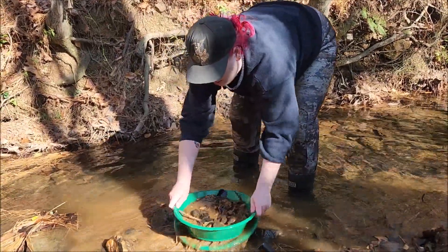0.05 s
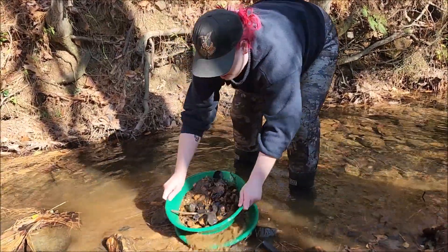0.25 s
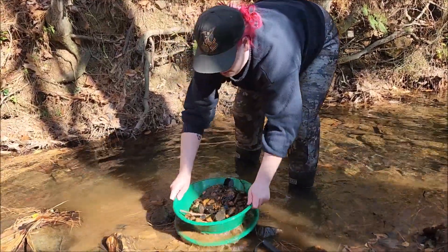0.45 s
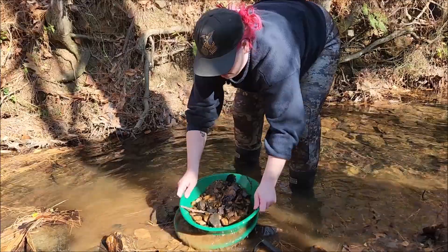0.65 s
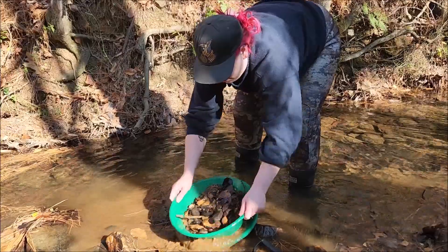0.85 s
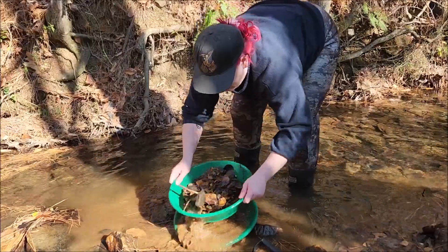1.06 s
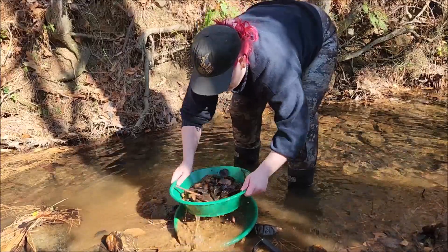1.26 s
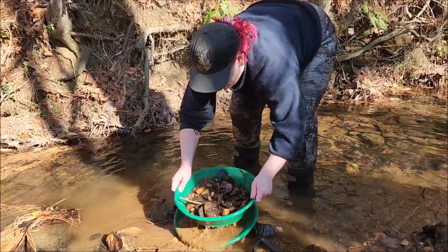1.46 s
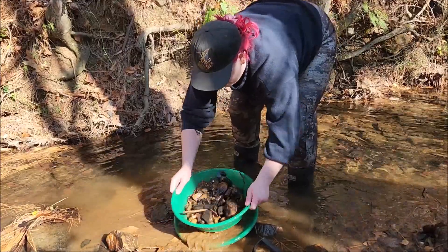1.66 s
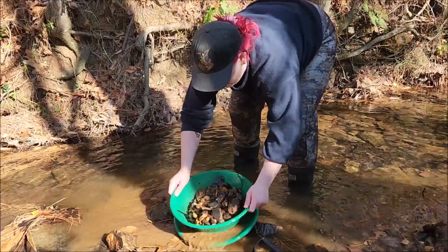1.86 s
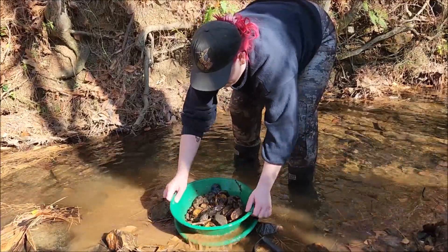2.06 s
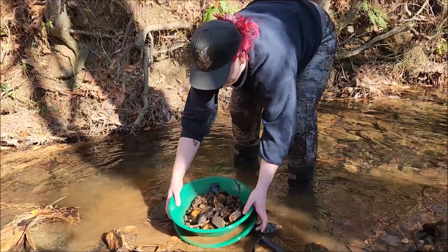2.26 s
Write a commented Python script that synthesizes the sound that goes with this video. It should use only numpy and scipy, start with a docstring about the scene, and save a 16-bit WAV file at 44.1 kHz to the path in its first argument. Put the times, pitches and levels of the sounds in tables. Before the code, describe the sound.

Wet gravel rattles and water sloshes in a plastic sieve shaken in a creek.

```python
"""Sieving gravel in a creek

A plastic sieve of wet gravel is shaken back and forth in shallow water. With each stroke pebbles
tumble and knock, ringing the plastic; grit scrapes over the mesh, stones click, and water sloshes
through in splashes and ringing bubbles. The creek trickles behind; a breeze rumbles on the microphone."""
import sys
import numpy as np
from scipy import signal
from scipy.fft import rfft, irfft, next_fast_len
from scipy.io import wavfile
from scipy.ndimage import uniform_filter1d

SR = 44100
rng = np.random.default_rng(int(sys.argv[2]) if len(sys.argv) > 2 else 0)


def materialize(psi):
    """Save the field psi as 16-bit PCM at rate SR to the path in sys.argv[1].

    A 1-D psi becomes a single channel; in a 2-D psi each row is a channel.
    """
    bounded = np.clip(np.atleast_2d(psi).T, -1, 1)
    quanta = np.round(bounded * 32767).astype(np.int16)
    wavfile.write(sys.argv[1], SR, quanta)


N = 101429
GRAIN_SAMPLES, PREROLL_SAMPLES = 4096, 32
GRAIN_T = np.arange(GRAIN_SAMPLES) / SR  # seconds into one contact or bubble


def amp(db):
    """Decibels to gain."""
    return 10 ** (np.asarray(db) / 20)


def curve_at(points, hz):
    """Reads a curve on a log-frequency axis."""
    freqs, values = np.transpose(points)
    return np.interp(np.log(hz + 1), np.log(freqs + 1), values)


def fader(curve, column=1):
    """Gain at every sample from one dB column of a level curve."""
    rows = np.array(curve)
    return amp(np.interp(np.arange(N) / SR, rows[:, 0], rows[:, column]))


def add(mix, start_s, sound):
    """Drops a stereo sound into the mix."""
    part = mix[:, max(round(start_s * SR), 0):][:, :sound.shape[1]]
    part += sound[:, :part.shape[1]]


# How alike the two channels are: freq_hz, coherence
STEREO_LIKENESS = [(50, 0.94), (200, 1), (550, 0.97), (1200, 0.92), (1550, 0.96), (2400, 0.34),
                   (3100, 0.15), (4200, 0.56), (6000, 0.12), (15000, 0.067)]
# Pan across the spectrum: freq_hz, left_minus_right_db
STEREO_PAN = [(100, 0.5), (400, -0.5), (560, -3), (900, 0.2), (1600, 0.5), (2200, 3), (3000, 12),
              (4000, 4.5), (5000, 1), (7000, -3), (9000, 7), (10800, 4), (12200, -3.5), (16000, 1)]
# Phase between the channels: freq_hz, left_lead_rad
STEREO_PHASE = [(500, 0.32), (1500, 0.85), (2800, 1), (3400, -1.4), (4300, 0.06), (16000, -3)]
def stereo(a, b):
    """Spreads two versions of a sound as mid and side: narrow in the bass, wide in the treble."""
    hz = np.fft.rfftfreq(len(a), 1 / SR)
    likeness = np.clip(curve_at(STEREO_LIKENESS, hz), 0, 1)
    mid = rfft(a) * np.sqrt((1 + likeness) / 2)
    side = rfft(b) * np.sqrt((1 - likeness) / 2)
    lean = amp(curve_at(STEREO_PAN, hz) / 2) * np.exp(.5j * curve_at(STEREO_PHASE, hz))
    return irfft([(mid + side) * lean, (mid - side) / lean])


def stereo_grain(pair):
    """Brings two versions of a hit to equal energy and spreads them in stereo."""
    return stereo(*[np.roll(hit, PREROLL_SAMPLES) / np.linalg.norm(hit) for hit in pair])


def shower(voice, per_s, spread_db, even_s, variants=24):
    """A cloud of randomly timed grains of mixed sizes, its level evened out over even_s."""
    hits = amp(spread_db * np.minimum(rng.exponential(1, N), 4))
    hits *= rng.random(N) < per_s / SR
    hits /= np.sqrt(abs(uniform_filter1d(hits ** 2, int(even_s * SR) + 1)) + 1e-6)
    variant = rng.integers(0, variants, N)
    cloud = sum(signal.oaconvolve((hits * (variant == k))[None], voice(), axes=1)[:, :N]
                for k in range(variants))
    return cloud / np.std(cloud.mean(0))


# Resonances of the loaded plastic sieve: pitch_hz, level_db, t60_s
SIEVE_MODES = [(388, -26, 0.048), (550.5, -21.5, 0.074), (905, -19, 0.055), (1081, -8.5, 0.025),
               (1430.6, -2, 0.039), (1542, -1, 0.028), (1650, 1.5, 0.018), (1960, -15.5, 0.04),
               (2185, -11, 0.044), (2370, -5.5, 0.01), (3750, -9.5, 0.012), (4240, -7, 0.0072),
               (4820, -15, 0.023)]
def sieve_ring(detune, uneven_db, rise_s, square_on=False):
    """Each strike spot weights and shifts the modes; a square blow starts the mid's modes in step."""
    hz, db, t60_s = np.transpose(SIEVE_MODES)[:, :, None]
    shift, weight, polarity = rng.standard_normal((3, 2, len(SIEVE_MODES), 1))
    if square_on:
        polarity[0] = 1
    decay = amp(db + uneven_db * weight - 60 * GRAIN_T / t60_s)
    modes = np.sign(polarity) * decay * np.sin(2 * np.pi * hz * (1 + detune * shift) * GRAIN_T)
    attack = 1 - np.exp(-GRAIN_T / rise_s)
    return stereo_grain(modes.sum(1) * attack)


# The shaking strokes, as fader moves: time_s, pebbles_db, grit_db
STROKES = [(0, -38, -54.5), (.11, -40.5, -49.5), (.18, -40, -59.5), (.22, -26.5, -41.5), (.3, -30, -51),
           (.375, -20.5, -39.5), (.43, -44, -52.5), (.455, -35.5, -55), (.49, -19, -36), (.53, -24, -38.5),
           (.588, -39, -55), (.615, -18.5, -38.5), (.65, -17, -28.5), (.71, -27.5, -41), (.755, -17, -35),
           (.84, -28.5, -48), (.9, -20, -34), (.925, -19.5, -23), (.96, -18, -33.5), (1.03, -27.5, -39.5),
           (1.065, -38, -54.5), (1.092, -42, -46), (1.107, -26, -42.5), (1.14, -18.5, -29),
           (1.25, -20.5, -29.5), (1.285, -14, -26), (1.315, -25, -33.5), (1.338, -53, -47),
           (1.37, -33.5, -47.5), (1.42, -14.5, -27.5), (1.51, -30.5, -28), (1.6, -26, -40.5),
           (1.67, -23, -32), (1.86, -24, -40.5), (1.93, -22.5, -34), (1.97, -14, -28.5),
           (2.03, -26.5, -44.5), (2.06, -31.5, -48.5), (2.12, -45.5, -59), (2.23, -68, -58.5),
           (2.3, -48, -50.5)]
def pebbles(gain_db=-3):
    """A dense tumble of pebbles keeps the sieve ringing."""
    rattle = shower(lambda: sieve_ring(detune=.012, uneven_db=3.5, rise_s=.00013),
                    per_s=850, spread_db=2.8, even_s=.025)
    return amp(gain_db) * fader(STROKES) * rattle


def burst(spectrum, t60_s):
    """One small contact or splash: a fast-dying puff of noise, coloured by a spectrum."""
    hz = abs(np.fft.fftfreq(GRAIN_SAMPLES, 1 / SR))
    log_gain = np.log(amp(curve_at(spectrum, hz)))
    colour = np.exp(np.conj(signal.hilbert(log_gain)))  # minimum phase keeps the attack sharp
    noise = rng.standard_normal((2, GRAIN_SAMPLES)) * amp(-60 * GRAIN_T / t60_s)
    return stereo_grain(np.fft.ifft(np.fft.fft(noise) * colour).real)


def clink(low_hz=3300, high_hz=5200, t60_s=.084):
    """A thin stone chip rings briefly at its own pitch."""
    hz = low_hz * (high_hz / low_hz) ** rng.random()
    decay = amp(-60 * GRAIN_T / t60_s)
    tones = [decay * np.sin(2 * np.pi * (hz * GRAIN_T + phase)) for phase in rng.random(2)]
    return stereo(*np.roll(tones, PREROLL_SAMPLES, axis=1))


# Tone colour of a gritty contact: freq_hz, level_db
GRIT_SPECTRUM = [(300, -13.5), (900, 0.5), (1600, 12.5), (2300, 1.5), (3100, -7), (4000, 3), (4900, -2),
                 (5700, -6), (6700, -8.5), (7600, -5.5), (9000, -9.5), (10800, -5.5), (12000, -5.5),
                 (13500, -13), (16000, -9)]
def grit(scrape_db=8, clink_db=-6):
    """Wet sand and small stones wash over each other and the mesh, with chips clinking among them."""
    scrape = shower(lambda: burst(GRIT_SPECTRUM, t60_s=.018), per_s=3800, spread_db=2.9, even_s=.025)
    clinks = shower(clink, per_s=220, spread_db=4, even_s=.06, variants=16)
    return fader(STROKES, column=2) * (amp(scrape_db) * scrape + amp(clink_db) * clinks)


def bubble(low_hz=450, high_hz=2400, cycles=22, rise=.19):
    """A small bubble rings and rises in pitch, fading 40 dB over about the given cycles."""
    hz = low_hz * (high_hz / low_hz) ** rng.random()
    age = GRAIN_T * hz / cycles
    envelope = amp(-40 * age) * np.minimum(GRAIN_T * hz, 1)
    tone = np.sin(2 * np.pi * hz * GRAIN_T * (1 + rise * age / 2))
    return np.tile(envelope * tone, (2, 1))


# Surges of water through the mesh: time_s, level_db
SURGES = [(0.0, -43), (0.22, -44.5), (0.29, -36), (0.31, -42), (0.36, -33.5), (0.45, -52), (0.48, -27.5),
          (0.54, -35.5), (0.58, -59), (0.63, -26.5), (0.72, -41), (0.76, -27), (0.84, -52), (0.94, -21.5),
          (1.07, -53), (1.23, -26.5), (1.3, -25), (1.36, -69), (1.41, -53), (1.54, -24.5), (1.57, -66),
          (1.71, -32.5), (1.88, -45.5), (1.97, -27), (2.15, -50.5), (2.3, -48)]
# Tone colour of a splash: freq_hz, level_db
SPLASH_SPECTRUM = [(40, -36), (150, -24), (290, -12), (390, -3), (540, 2), (680, -8.5), (1100, -2.5),
                   (2500, -7.5), (16000, -40)]
def slosh(splash_db=.5, bubble_db=-5):
    """Water pushes through the mesh and breaks into splashes and bubbles."""
    splashes = shower(lambda: burst(SPLASH_SPECTRUM, t60_s=.04), per_s=460, spread_db=4, even_s=.16)
    bubbles = shower(bubble, per_s=130, spread_db=6, even_s=.033)
    return fader(SURGES) * (amp(splash_db) * splashes + amp(bubble_db) * bubbles)


# Swells under the sieve, late in the strokes: time_s, level_db
CHURN_SWELLS = [(0, -61), (.74, -55), (.765, -36.5), (.81, -58), (.91, -56), (.96, -40.5), (1.005, -40.5),
                (1.06, -58), (1.11, -63), (1.15, -44.5), (1.2, -54), (1.28, -38.5), (1.35, -60),
                (1.52, -37.5), (1.61, -56.5), (1.76, -45), (1.89, -53.5), (1.97, -45), (2.14, -59),
                (2.3, -54.5)]
# Low body of the churning: freq_hz, level_db
CHURN_SPECTRUM = [(30, -9), (70, -13.5), (120, -2), (190, 0), (280, -1), (420, -2), (900, -49), (3000, -93)]
def churn(gain_db=4.5):
    """Water churns deeply as the sieve plunges."""
    body = shower(lambda: burst(CHURN_SPECTRUM, t60_s=.016),
                  per_s=540, spread_db=2.5, even_s=.075, variants=12)
    return amp(gain_db) * fader(CHURN_SWELLS) * body


# Tone colour of the trickle: freq_hz, level_db
CREEK_SPECTRUM = [(60, 0), (250, -17), (550, 7), (1000, 15), (1600, 5), (3000, -18), (4500, -15),
                  (6500, -19), (11000, -30), (16000, -5)]
def creek(gain_db=-58.5):
    """Countless tiny splashes blend into a faint, steady trickle."""
    return amp(gain_db) * shower(lambda: burst(CREEK_SPECTRUM, t60_s=.021),
                                 per_s=1300, spread_db=2.8, even_s=.5, variants=12)


# Tone colour of the wind rumble: freq_hz, level_db
BREEZE_SPECTRUM = [(10, -3), (30, -1.5), (62, 4.5), (90, -1), (150, -28), (400, -41), (2000, -80)]
# Gusts: time_s, level_db
BREEZE_GUSTS = [(0, -37), (.03, -41), (.07, -49), (.17, -38.5), (.25, -48), (.31, -36), (.34, -44.5),
                (.45, -41.5), (.52, -54), (2.3, -47.5)]
def breeze():
    """Light gusts buffet the microphone with a low rumble."""
    length = 2 * next_fast_len(N)
    colour = amp(curve_at(BREEZE_SPECTRUM, np.fft.rfftfreq(length, 1 / SR)))
    air = irfft(rfft(rng.standard_normal((2, length))) * colour)
    rumble = stereo(*air)[:, :N]
    return fader(BREEZE_GUSTS) * rumble / np.sqrt(np.mean(rumble ** 2))


# Stone-on-stone accents: start_s, level_db
STONE_CLICKS = [(0.015, -27), (0.021, -24), (0.917, -18), (1.165, -13), (1.326, -17), (1.345, -22),
                (1.417, -15), (1.714, -5), (2.054, -24), (2.125, -26), (2.242, -31), (2.255, -21)]
def stone_clicks(gain_db=10):
    """Hard stones snap against each other."""
    out = np.zeros((2, N))
    for start_s, db in STONE_CLICKS:
        snap = np.diff(burst(GRIT_SPECTRUM, t60_s=.014), axis=1)  # tilted bright
        add(out, start_s - .0005, amp(db + gain_db) * snap)
    return out


# Single chips of stone: start_s, pitch_hz, level_db
CHIP_TICKS = [(.029, 4800, -17), (.088, 4000, -15), (.109, 4200, -11), (1.178, 4100, 11), (1.744, 4570, 1),
              (2.115, 4000, -20)]
def chip_ticks():
    """Small chips tick, each a narrow burst around its own pitch."""
    out = np.zeros((2, N))
    for start_s, hz, db in CHIP_TICKS:
        peak = [(hz / 2, -30), (hz, 0), (hz * 2, -30)]
        add(out, start_s - .0005, amp(db) * burst(peak, t60_s=.011))
    return out


# Single stones striking the sieve: start_s, level_db
WALL_KNOCKS = [(.089, -26), (.201, -23), (.242, -18), (.477, -14), (.486, -10), (.611, -17), (.645, -10),
               (.731, -9), (.744, -10), (.762, -12), (.824, -16), (.914, -5), (.930, -9), (.949, -4),
               (.959, -6), (1.102, -21), (1.219, -11), (1.278, -3), (1.285, -6), (1.296, -4), (1.324, -17),
               (1.3445, -13.5), (1.39, -18), (1.422, -11), (1.462, -9), (1.496, -9), (1.53, -11),
               (1.613, -16), (1.67, -11), (1.785, -15), (1.897, -8.5), (1.913, -12), (1.971, -8),
               (2.038, -19), (2.051, -16), (2.09, -25), (2.143, -32), (2.159, -21), (2.255, -28),
               (2.287, -28)]
def knocks(gain_db=16.5, tick_db=-12.5, contact_hz=2400, max_bounce_s=.004, bounce_db=-5):
    """Larger stones hit the soft plastic wall with a dull, hollow ring and a tick, and bounce once."""
    out = np.zeros((2, N))
    soft_contact = signal.butter(2, contact_hz, fs=SR)
    for start_s, db in WALL_KNOCKS:
        bounce_s = max_bounce_s * rng.uniform(.67, 1)
        for delay_s, drop_db in ((0, 0), (bounce_s, bounce_db)):
            ring = sieve_ring(detune=.014, uneven_db=1.5, rise_s=.00043, square_on=True)
            hollow = signal.lfilter(*soft_contact, ring)
            tick = amp(tick_db) * burst(GRIT_SPECTRUM, t60_s=.008)
            add(out, start_s + delay_s - .001, amp(db + drop_db + gain_db) * (hollow + tick))
    return out


def drain(start_s=.116, length_s=.034, from_hz=1150, to_hz=600, gain_db=-28, count=14):
    """Water drains as the sieve first lifts: a quick, ragged run of tiny bubbles, falling in pitch."""
    out = np.zeros((2, N))
    for progress, jitter in zip(np.linspace(0, 1, count), rng.uniform(-.92, 1, count)):
        hz = from_hz * (to_hz / from_hz) ** progress
        blip = bubble(hz * .79, hz * 1.23, cycles=9.8)
        add(out, start_s + length_s * (progress + jitter / count), amp(gain_db) * blip)
    return out


# Large bubbles and deep gulps: start_s, pitch_hz, level_db
AIR_PLOPS = [(0.125, 383, -36), (.273, 377, -21), (.752, 559, -25.5), (0.946, 374, -23), (.99, 182, -30.5),
             (1.463, 520, -25.5), (1.487, 147, -28.5), (1.524, 476, -27), (1.77, 183, -31)]
def plops(attack_s=.01, t60_s=.06, glide_per_s=.8):
    """Trapped air escapes in round bubbles that rise slightly in pitch."""
    out, t = np.zeros((2, N)), GRAIN_T
    envelope = np.minimum(t / attack_s, 1) * amp(-60 * np.maximum(t - attack_s, 0) / t60_s)
    for start_s, hz, db in AIR_PLOPS:
        tone = np.sin(2 * np.pi * hz * t * (1 + glide_per_s * t / 2))
        add(out, start_s, np.tile(amp(db) * envelope * tone, (2, 1)))
    return out


def bank_echoes(sound, gain_db=-23, build_s=.028, t60_s=.091):
    """Faint echoes scatter back from the water and the creek bank."""
    t = np.arange(SR // 3) / SR
    tail = rng.standard_normal((2, len(t))) * amp(-60 * t / t60_s) * np.minimum(t / build_s, 1)
    return amp(gain_db) * signal.fftconvolve(sound, tail / np.linalg.norm(tail[0]), axes=1)[:, :N]


def scene():
    """Gravel and water up front with their echoes, over a bed of creek and breeze."""
    gravel = pebbles() + grit() + knocks() + stone_clicks() + chip_ticks()
    water = slosh() + churn() + plops() + drain()
    sieve = gravel + water
    return sieve + bank_echoes(sieve) + creek() + breeze()


def record(dry):
    """A soft clip rounds the highest peaks, and a steep low-pass trims the top treble."""
    ceiling, cutoff_hz = .85, 15850
    rounded = dry / (1 + (dry / ceiling) ** 6) ** (1 / 6)
    lowpass = signal.firwin(511, cutoff_hz, window=("kaiser", 9), fs=SR)
    return signal.oaconvolve(rounded, lowpass[None], "same")


dry = scene()
out = record(dry)
materialize(out)
```